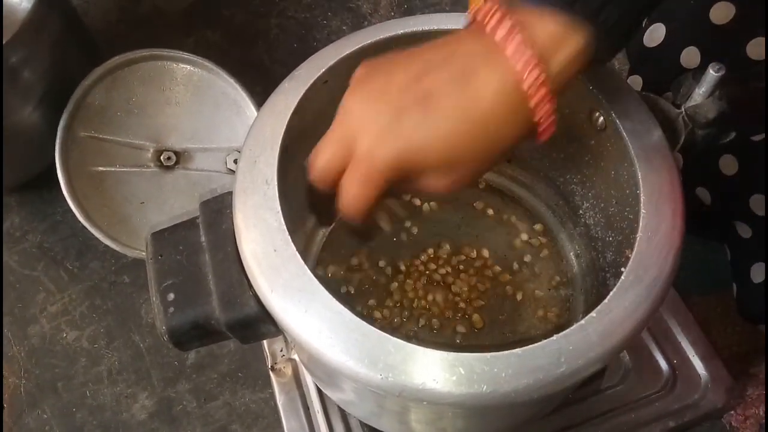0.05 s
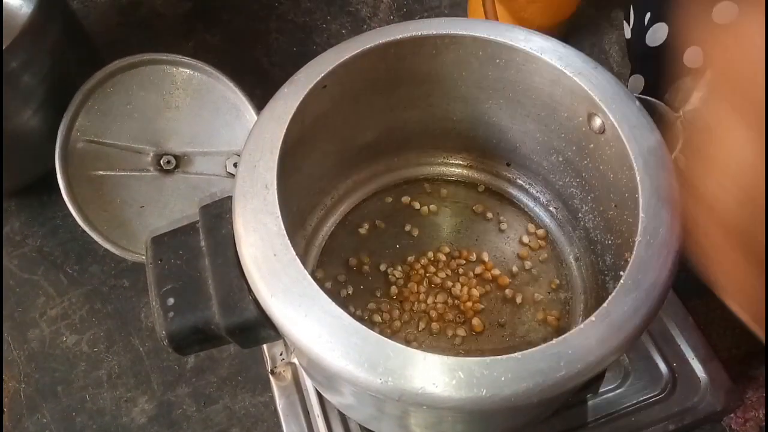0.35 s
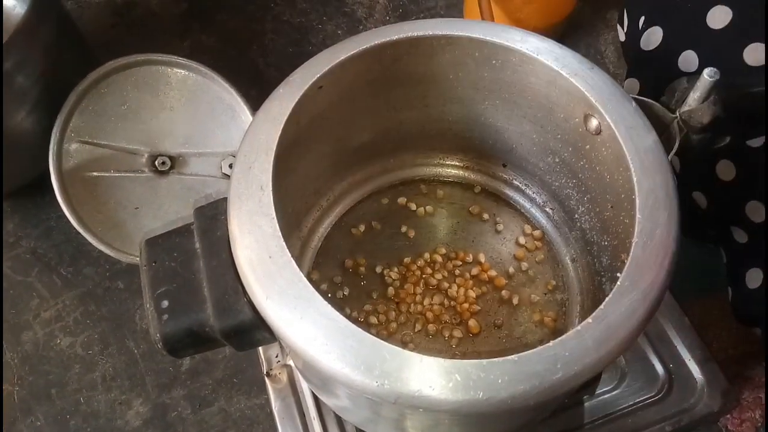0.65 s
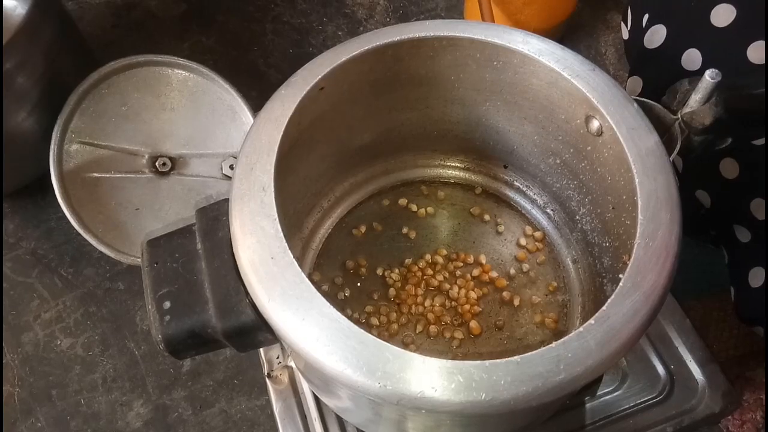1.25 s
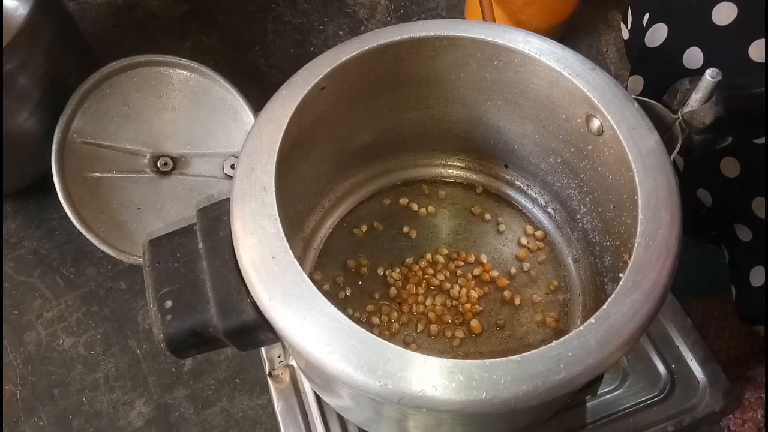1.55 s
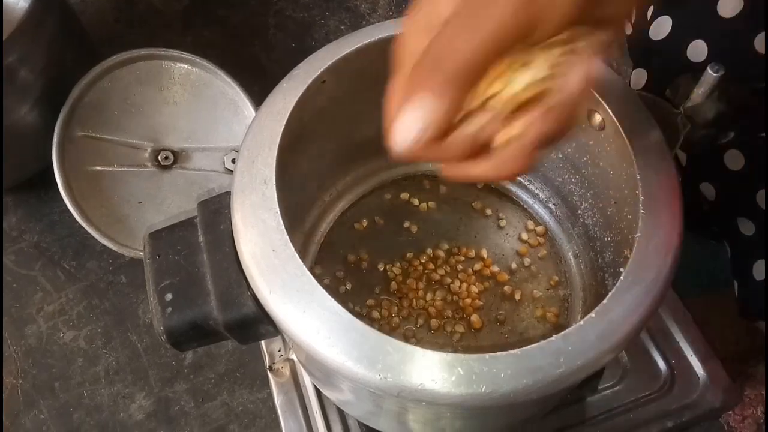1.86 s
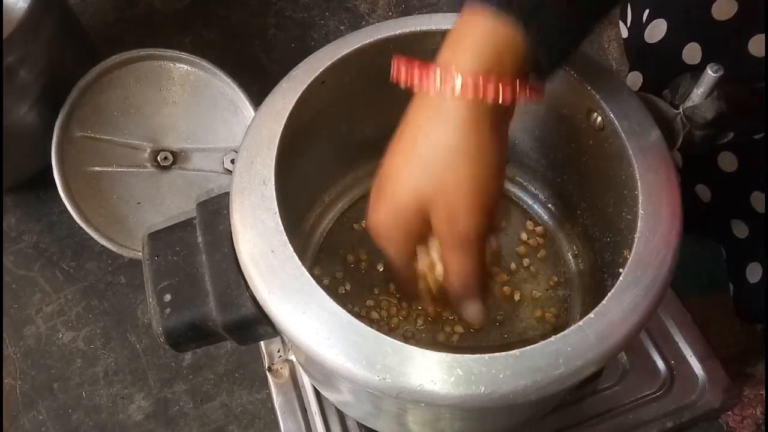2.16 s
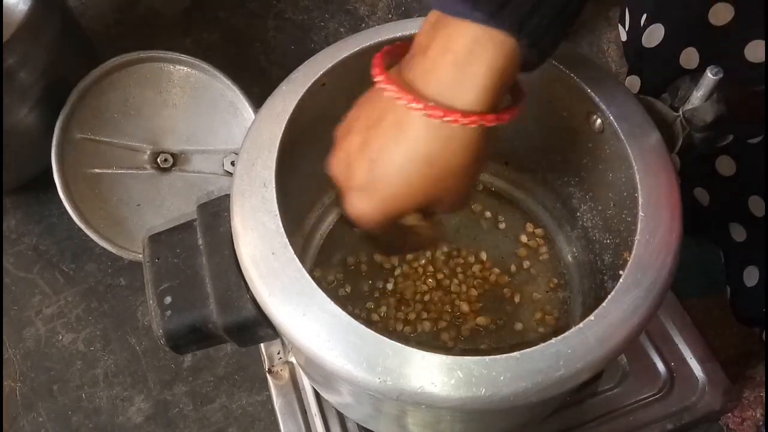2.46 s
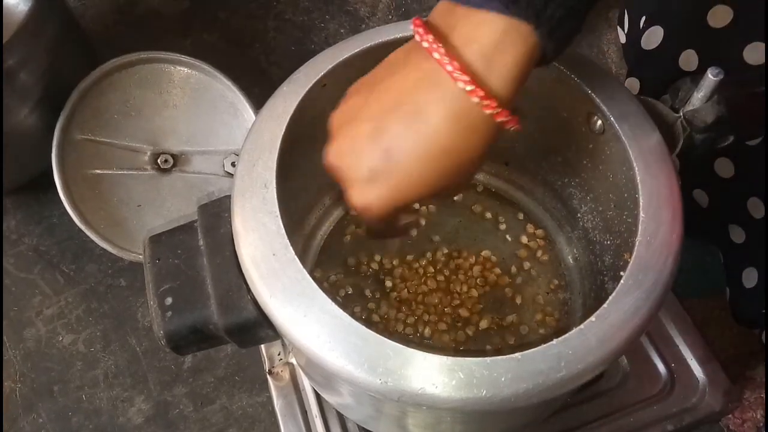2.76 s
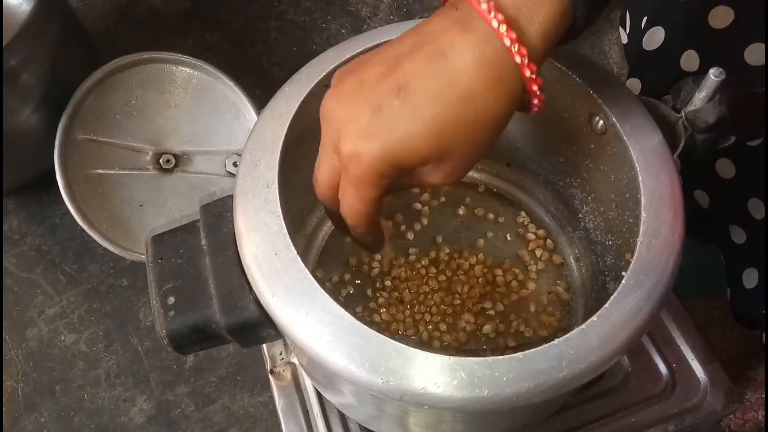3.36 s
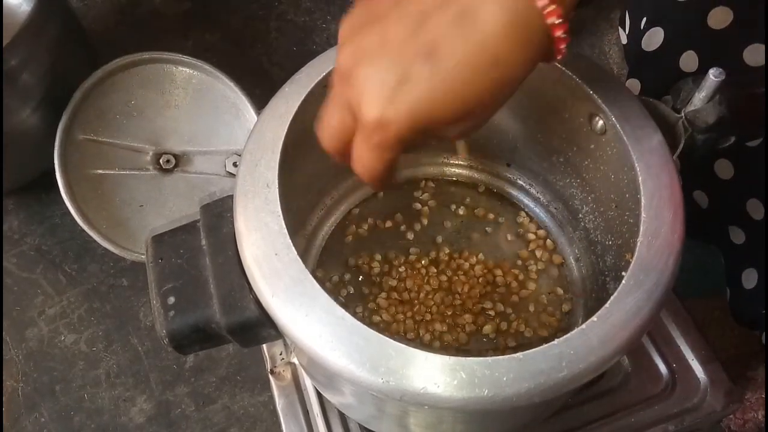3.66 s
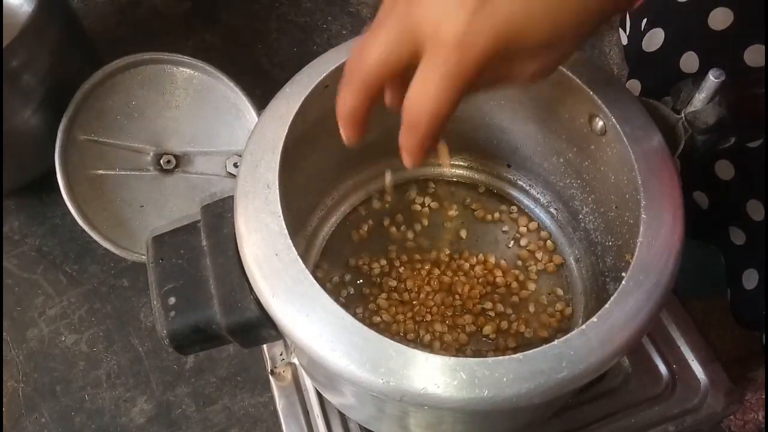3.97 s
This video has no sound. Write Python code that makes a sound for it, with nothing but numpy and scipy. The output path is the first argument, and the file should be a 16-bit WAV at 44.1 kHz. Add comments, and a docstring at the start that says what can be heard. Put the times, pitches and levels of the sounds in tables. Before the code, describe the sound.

Dry corn kernels clatter into a metal pressure cooker close by. A hand knocks a container, crunches through the corn and slides out, then a longer handful patters in. A small bird chirps faintly beyond, in a slightly echoing kitchen.

```python
"""Dry corn kernels clatter from a hand into a metal pressure cooker; each ticks, bounces and rings it.
Between two handfuls the hand knocks against a container, crunches through the corn and slides out
with a hollow hiss. A small bird chirps nearby in quick, gliding whistles.
The hard walls of the small kitchen give everything a short echo, over a faint hush of air."""
import sys
import numpy as np
from scipy import signal
from scipy.fft import rfft, irfft
from scipy.io import wavfile
from scipy.ndimage import uniform_filter1d

SR = 44100
rng = np.random.default_rng(int(sys.argv[2]) if len(sys.argv) > 2 else 0)


def log_audio(samples):
    """Write samples as a 16-bit WAV file to the path given in sys.argv[1]."""
    # one column per channel
    frames = np.atleast_2d(samples).T
    # limit to full scale, then quantise
    limited = np.clip(frames, -1, 1)
    pcm = np.round(limited * 32767).astype(np.int16)
    wavfile.write(sys.argv[1], SR, pcm)


N = 176400  # 4 seconds

# Kernels hitting the pot: start_s, tick_energy_db, fizz_energy_db
KERNEL_HITS = [(0.0389, -3.5, -7), (0.0488, 6, -4), (0.1034, 4.5, 1.5), (0.109, 3, -3), (0.128, -1.5, 1.5),
               (0.1572, 6, 6), (0.2188, -1, -3.5), (0.246, 3, -3), (0.2729, 0, -3.5), (2.2205, 4.5, 0.5),
               (2.356, -2.5, -11), (2.3639, 5.5, 3), (2.37, -5.5, 1), (2.3954, 2, 5), (2.4139, -4, 3),
               (2.4328, 0.5, 7), (2.4572, 2, -2), (2.4894, 2.5, 2), (2.5067, 4, 3), (2.5468, -1, 1.5),
               (2.567, -8, -4), (2.6121, 6, 1), (2.7099, 4.5, -1), (2.753, -24, -1.5), (2.77, 0.5, -18),
               (2.805, 5, -1), (2.8269, -4, -13), (2.8593, 4, 4), (2.893, -1, -13), (2.9295, 1, 5.5),
               (2.94, 3.5, -1), (2.9581, 3, 3), (2.9945, -2.5, 6), (3.0194, 3.5, 3.5), (3.0689, 5, -0.5),
               (3.0962, 4.5, -2), (3.159, 5.5, -4), (3.2498, 3.5, 2), (3.2587, -0.5, -7), (3.2969, 6, 0.5),
               (3.3266, 6, -3), (3.412, 3.5, -3.5), (3.5502, 2, -14), (3.608, 3.5, -5), (3.647, 4.5, -7),
               (3.7698, -7, -18), (3.7759, 4, -5), (3.8051, -3.5, -8), (3.817, 1.5, 3.5), (3.8314, -1.5, 2),
               (3.8687, -2.5, -16), (3.8954, 4.5, 2.5), (3.9204, 4.5, -5), (3.941, 2.5, 1),
               (3.98, -1.5, -4)]
# Small kernels skittering in between: time_s, level_db
SKITTER_LEVELS = [(0, -32.5), (.06, -32), (.33, -40), (.45, -56), (2.34, -58), (2.37, -42), (2.53, -23.5),
                  (2.65, -31.5), (2.74, -36), (2.85, -27), (2.98, -32.5), (3.37, -34), (3.52, -44),
                  (3.63, -33.5), (3.74, -45), (4, -38.5)]
# The tone of a tick, from low to high: frequency_hz, relative_db
TICK_TONE = [(200, -41), (430, -15), (620, -17.5), (800, -10.5), (1200, -22), (2200, -15.5), (3100, -9.5),
             (5600, -7.5), (6350, 3), (7000, 0), (8300, -12.5), (14000, -46)]
# How long a tick takes to fade: frequency_hz, fade_s
TICK_FADES = [(400, 0.047), (3000, 0.078), (6500, 0.038), (12000, 0.02)]
# The bright fizz on top of a tick: frequency_hz, relative_db
FIZZ_TONE = [(5500, -29), (9000, 2.5), (13500, -9), (15500, 4.5)]

def kernels_in_pot(spots=12, size=8192):
    """Kernels land and bounce twice; each spot on the pot ticks, fizzes and rings in its own way."""
    skitter = patter(per_s=800, spread_db=7.5) * loudness(SKITTER_LEVELS)
    ticks = skitter * (rng.integers(0, spots, N) == np.arange(spots)[:, None])  # one row per spot
    pushes, snaps = ticks * gain(6), ticks * gain(-14)  # these set off the ring and the fizz
    t = np.arange(size) / SR
    responses = [(reflections(TICK_FADES), crack(fade_s=0.019), pot_ring(t)) for _ in ticks]
    for k, (start_s, tick_db, fizz_db) in enumerate(KERNEL_HITS):
        gaps_s = 0.0035 * rng.uniform(0.5, 1.5, 2)
        landings_s = start_s + np.cumsum([0, *gaps_s])
        for bounce, force in enumerate([1, 0.46, 0.23]):
            spot = (k + bounce) % spots
            for track, db in (ticks, tick_db), (pushes, tick_db), (snaps, fizz_db):
                add(track[spot], landings_s[bounce], [force * gain(db)])
    rise = 1 - np.exp(-t / 0.00019)  # softens the very start of each hit
    clatter, fizz, ring = np.zeros((3, N))
    for tick, push, snap, (scatter, burst, notes) in zip(ticks, pushes, snaps, responses):
        clatter += through(tick, scatter * rise[:len(scatter)])
        fizz += through(snap, burst * rise[:len(burst)])
        ring += through(push, notes)
    return ring + shape_tone(clatter, TICK_TONE) + shape_tone(fizz, FIZZ_TONE)

# The notes the metal pot rings with: pitch_hz, energy_db, fade_s
POT_NOTES = [(405.2, -25.5, 0.21), (473, -30, 0.28), (814, -17.5, 0.086), (1131, -29.5, 0.053),
             (1440, -25.5, 0.053), (1570, -25.5, 0.062)]

def pot_ring(t, detune=0.01):
    """One spot's own mix of the pot's notes; the corn weighs on each spot differently, detuning it."""
    pitch_hz, energy_db, fade_s = np.transpose(POT_NOTES)
    count = len(POT_NOTES)
    pitch_hz = pitch_hz * (1 + detune * rng.standard_normal(count))
    strengths = normalize(rng.uniform(0.5, 1, count)) * rng.choice([-1, 1], count)
    notes = np.array([np.sin(2 * np.pi * hz * t) * fade(t, s) for hz, s in zip(pitch_hz, fade_s)])
    return (strengths * gain(energy_db) / np.linalg.norm(notes, axis=1)) @ notes

# The hand bumping the container: start_s, level_db, pitch_hz, swell_s, rattle_db
CONTAINER_KNOCKS = [(0.183, -31, 310, 0.0054, -37), (0.3912, -11, 414, 0.002, -21.5),
                    (0.3988, -12, 210, 0.0038, -19.5), (.404, -23, 984, 0.0082, -30),
                    (0.594, -7, 384.7, 0.0054, -37), (.6, -29, 3250, 0.0073, -37),
                    (0.7756, -15.5, 407, 0.0023, -23), (.784, -15, 302, 0.0027, -20),
                    (0.8324, -12, 630, 0.001, -46)]
# The tone of the corn rattling inside: frequency_hz, relative_db
RATTLE_TONE = [(40, -21), (100, -2.5), (500, -9), (1050, -10), (1350, -23), (2500, -21), (4000, -9),
               (5200, -22), (15000, -83)]

def container_knocks(size=4096, rattle_swell_s=0.0066):
    """The container's wall swings a few times and the corn inside jumps."""
    t = np.arange(size) / SR
    wall, corn = np.zeros((2, N))
    for start_s, level_db, pitch_hz, swell_s, rattle_db in CONTAINER_KNOCKS:
        thud = bump(t, swell_s) ** 2 * np.sin(2 * np.pi * pitch_hz * t)
        rattle = bump(t, rattle_swell_s) * rng.standard_normal(size)
        add(wall, start_s, gain(level_db) * thud)
        add(corn, start_s, gain(rattle_db) * rattle)
    return wall + shape_tone(corn, RATTLE_TONE)

# The crunch of digging: time_s, level_db
CRUNCH_LEVELS = [(.77, -70), (.8, -36.5), (.86, -24.5), (.895, -28), (.97, -22.5), (1.14, -38), (1.39, -35),
                 (1.52, -44), (1.8, -77)]
# Its tone: frequency_hz, relative_db
CRUNCH_TONE = [(60, -44), (130, -19), (370, -13.5), (520, -2.5), (830, 2.5), (1320, -13), (3900, -3.5),
               (5100, -8), (6400, 0), (9400, -23), (13500, -29.5), (15100, -22)]
# Kernels scraping and snapping past each other: start_s, energy_db, swell_s
SCRAPES = [(0.738, -18, 0.00076), (1.161, -3, 0.0096), (1.201, 0.5, 0.0095), (1.265, -4, 0.0043),
           (1.3, -2, .0025), (1.334, 0.5, 0.0018), (1.378, 5, 0.0065), (1.4694, 5, 0.0013),
           (1.5525, -2.5, 0.0019)]
# Their tone: frequency_hz, relative_db
SCRAPE_TONE = [(300, -19.5), (3500, -26), (5400, -0.5), (6400, 6.5), (7300, -5.5), (13500, -23),
               (15200, -19)]

def hand_digging(kinds=6):
    """Fingers push through the corn, making a mass of tiny clicks and a few louder scrapes."""
    clicks = patter(per_s=1300, spread_db=4.5) * loudness(CRUNCH_LEVELS)
    kind = rng.integers(0, kinds, N)
    crunch = sum(through(clicks * (kind == k), crack(fade_s=0.018)) for k in range(kinds))
    t = np.arange(SR // 10) / SR
    scrapes = np.zeros(N)
    for start_s, energy_db, swell_s in SCRAPES:
        scrape = bump(t, swell_s) * rng.standard_normal(len(t))
        add(scrapes, start_s, gain(energy_db) * unit_energy(scrape))
    return shape_tone(crunch, CRUNCH_TONE) + shape_tone(scrapes, SCRAPE_TONE)

# The hand sliding out: time_s, hiss_db, hollow_db, pitch_hz
SLIDE_PATH = [(1.49, -41.5, -52.5, 424), (1.57, -32, -38, 520), (1.729, -32.5, -41, 406),
              (1.803, -51.5, -49.5, 425)]
# The tone of the rubbing: frequency_hz, relative_db
HISS_TONE = [(150, -31), (500, -13.5), (1150, -7), (2000, -22.5), (4200, -2.5), (5700, 0.5), (6800, -8),
             (8300, -27), (13500, -36), (15200, -27)]

def hand_sliding(width_hz=165):
    """A rubbing hiss, with a hollow note that shifts as the hand leaves the container."""
    time_s, _, _, pitch_hz = np.transpose(SLIDE_PATH)
    glide_hz = np.interp(np.arange(N) / SR, time_s, pitch_hz)
    carrier = np.exp(2j * np.pi * np.cumsum(glide_hz) / SR)
    # Two filters, each width_hz wide, keep only the noise near the gliding pitch.
    pole = np.exp(-np.pi * width_hz / SR)
    slow_noise = signal.lfilter([1], np.poly([pole, pole]), rng.standard_normal(N) / carrier)
    hollow = normalize((carrier * slow_noise).real)
    hiss = shape_tone(rng.standard_normal(N), HISS_TONE)
    return hiss * loudness(SLIDE_PATH) + hollow * loudness(SLIDE_PATH, column=2)

# The bird's notes: start_s, length_s, first_hz, last_hz, level_db, buzz_depth_hz
BIRD_NOTES = [(0.064, .022, 5300, 4060, -35, 260), (0.517, .08, 4300, 2540, -42, 190),
              (1.347, 0.083, 3690, 3250, -40, 394), (1.845, 0.023, 3300, 5730, -42.5, 400),
              (1.869, 0.039, 5400, 3420, -29, 474), (1.916, 0.029, 3897, 4950, -27.5, 550),
              (2.866, 0.035, 5100, 5200, -30.5, 292), (3.2, 0.04, 4400, 3940, -36, 350),
              (3.377, 0.05, 5550, 4270, -31.5, 617), (3.577, 0.036, 4000, 2900, -33, 150),
              (3.614, .135, 3110, 1712, -48, 330), (3.877, 0.082, 3840, 3527, -35, 90),
              (3.969, 0.028, 3515, 4400, -31.5, 380)]

def bird_chirps(size=8192, buzz_hz=316.7, overtone_db=-28):
    """Each note is a gliding whistle, shaken by a fast uneven buzz and smeared by echoes on its way in."""
    out = np.zeros(N)
    for start_s, length_s, first_hz, last_hz, level_db, buzz_depth_hz in BIRD_NOTES:
        progress = np.linspace(0, 1, min(int(length_s * SR), size))
        wobble = normalize(uniform_filter1d(rng.standard_normal(size), size=60))[:len(progress)]
        buzz = np.sin(2 * np.pi * np.cumsum(buzz_hz * (1 + wobble / 2)) / SR) + wobble / 2
        glide_hz = first_hz * (last_hz / first_hz) ** progress
        phase = 2 * np.pi * np.cumsum(glide_hz + buzz_depth_hz * buzz) / SR
        swell = np.sqrt(abs(np.sin(np.pi * progress))) * gain(0.76 * wobble[::-1])
        note = normalize(swell * (np.sin(phase) + gain(overtone_db) * np.sin(2 * phase)))
        smeared = signal.fftconvolve(note, crack(fade_s=0.02))
        add(out, start_s, gain(level_db) * np.linalg.norm(note) * unit_energy(smeared))
    return out

# How long the kitchen echoes: frequency_hz, fade_s
KITCHEN_FADES = [(400, 0.41), (1500, 0.69), (5000, 0.42), (15000, 0.12)]

def kitchen_echo(sound):
    """Hard walls throw the sound back, starting 5 ms later."""
    return through(sound, np.pad(reflections(KITCHEN_FADES, size=32768), (SR // 200, 0)))

# The tone of the quiet room: frequency_hz, relative_db
AIR_TONE = [(40, -12), (90, 0.5), (200, -2.5), (1500, -18), (4000, -13), (10000, -42.5)]

def still_air(level_db=-51):
    """A faint, low, steady hush."""
    return gain(level_db) * shape_tone(rng.standard_normal(N), AIR_TONE, size=8192)

def gain(db):
    """Turns decibels into a multiplier."""
    return 10 ** (np.asarray(db) / 20)

def normalize(x):
    """Scales a sound to an average power of 1."""
    return x / np.sqrt(np.mean(x ** 2) + 1e-20)

def unit_energy(x):
    """Scales a sound to a total energy of 1."""
    return x / np.linalg.norm(x)

def look_up(table, hz):
    """Reads between a table's rows on a log frequency scale."""
    row_hz, values = np.transpose(table)
    return np.interp(np.log(hz + 1), np.log(row_hz + 1), values)

def loudness(rows, column=1):
    """Gain over time from a decibel column; silent before and after the rows."""
    rows = np.array(rows)
    return gain(np.interp(np.arange(N) / SR, rows[:, 0], rows[:, column], -np.inf, -np.inf))

def add(mix, start_s, sound):
    """Mixes a sound in at its start time."""
    part = mix[max(round(start_s * SR), 0):][:len(sound)]
    part += sound[:len(part)]

def through(x, response):
    """Lets every sample set off a copy of the response (convolution)."""
    return signal.oaconvolve(x, response)[:N]

def shape_tone(x, tone, size=2048):
    """Makes lows and highs louder or softer, following a tone table."""
    log_gain = np.log(gain(look_up(tone, abs(np.fft.fftfreq(size, 1 / SR)))))
    spectrum = np.exp(np.conj(signal.hilbert(log_gain)))  # rings after a hit, never before
    return through(x, unit_energy(np.fft.ifft(spectrum).real[:size // 2]))

def fade(t, fade_s):
    """Dies away by 60 dB in fade_s."""
    return np.exp(-np.log(1000) * t / fade_s)

def bump(t, swell_s):
    """Rises to 1 at swell_s, then dies away."""
    return t / swell_s * np.exp(1 - t / swell_s)

def reflections(fades, size=4096):
    """A blur of tiny echoes, each frequency band fading at its own speed."""
    t, hz = np.arange(size) / SR, np.fft.rfftfreq(size, 1 / SR)
    band_hz, fade_times_s = np.transpose(fades)
    spectrum = rfft(rng.standard_normal(size))
    out = np.zeros(size)
    for fade_s, share in zip(fade_times_s, np.eye(len(fades))):
        band = look_up(np.c_[band_hz, share], hz)
        out += irfft(spectrum * band) * normalize(fade(t, fade_s))
    return unit_energy(out)

def crack(fade_s, size=2048):
    """A short burst of noise."""
    return unit_energy(rng.standard_normal(size) * fade(np.arange(size) / SR, fade_s))

def patter(per_s, spread_db):
    """Random clicks of uneven size."""
    sizes = gain(spread_db * np.minimum(rng.exponential(1, N), 3))
    return normalize(sizes * rng.choice([-1, 1], N) * (rng.random(N) < per_s / SR))

def scene():
    """All the sources, each with its own amount of kitchen echo, over still air."""
    sources = [(kernels_in_pot(), -12.5), (container_knocks(), -18.5), (hand_digging(), -8.5),
               (hand_sliding(), -21), (bird_chirps(), -2)]  # sound, echo_db
    direct = sum(sound for sound, _ in sources)
    echo = kitchen_echo(sum(sound * gain(echo_db) for sound, echo_db in sources))
    return (direct + echo + still_air())[None]

def record(dry, ceiling=0.4, cutoff_hz=15900):
    """Rounds off the loudest peaks, then removes the very highest treble."""
    rounded = dry / (1 + (dry / ceiling) ** 4) ** (1 / 4)
    low_pass = signal.firwin(301, cutoff_hz, window=("kaiser", 8), fs=SR)
    return signal.oaconvolve(rounded, low_pass[None], "same")

dry = scene()
out = record(dry)
log_audio(out)
```